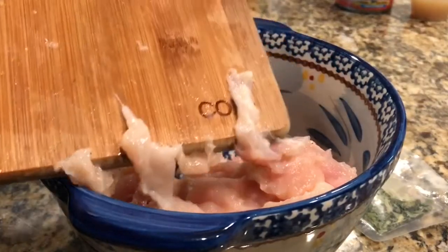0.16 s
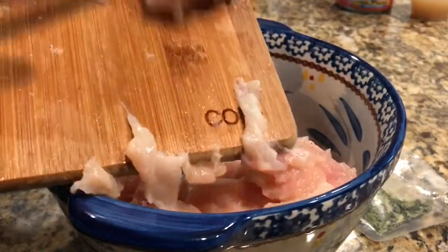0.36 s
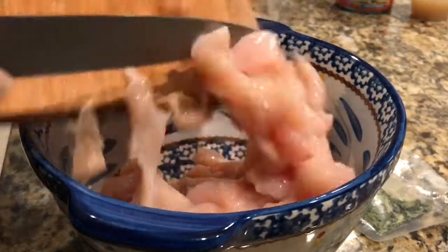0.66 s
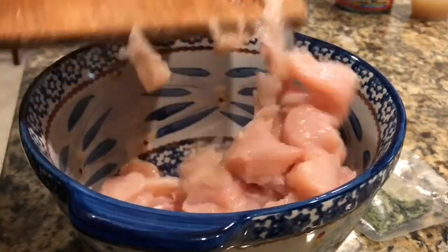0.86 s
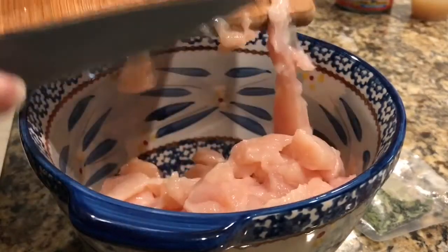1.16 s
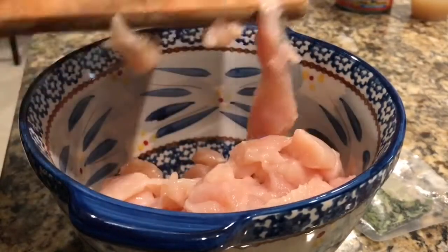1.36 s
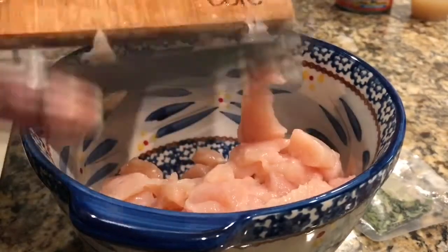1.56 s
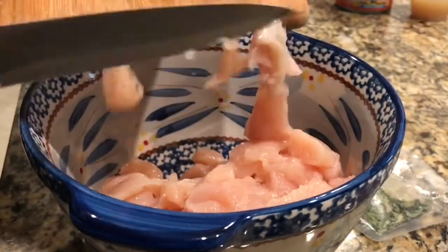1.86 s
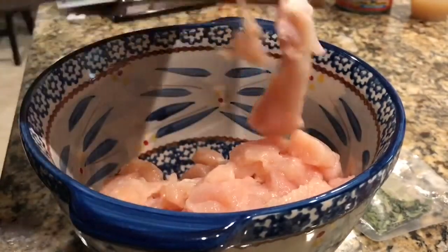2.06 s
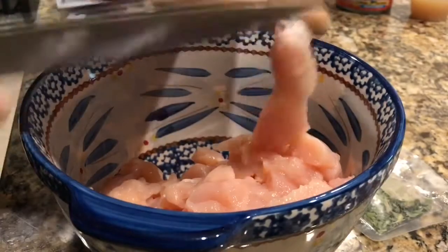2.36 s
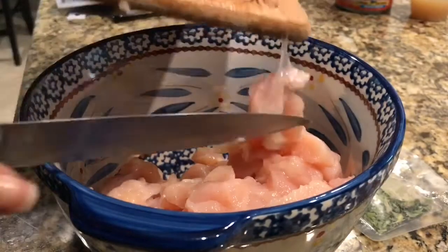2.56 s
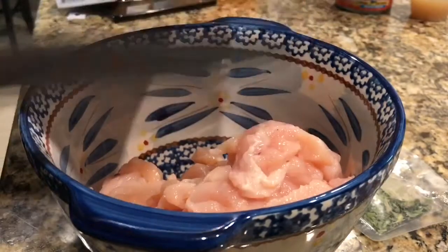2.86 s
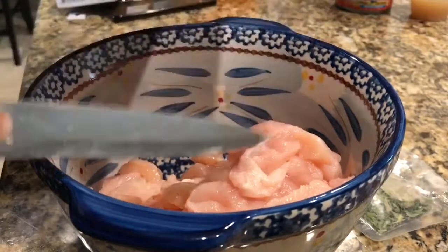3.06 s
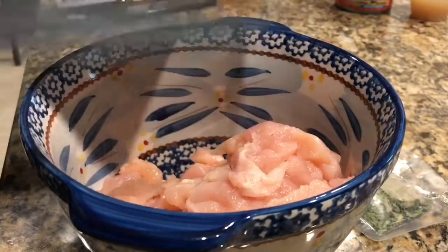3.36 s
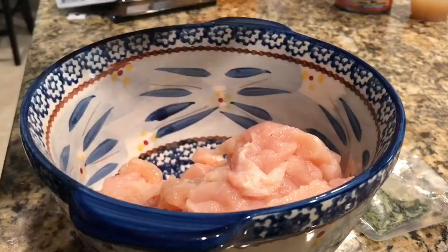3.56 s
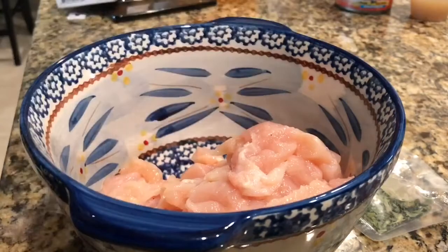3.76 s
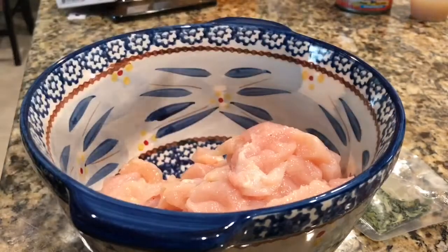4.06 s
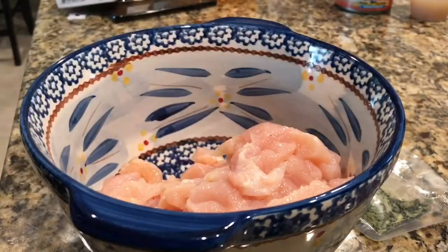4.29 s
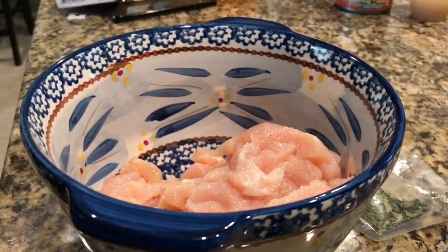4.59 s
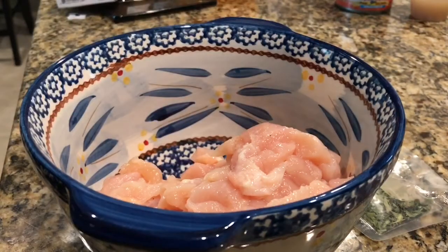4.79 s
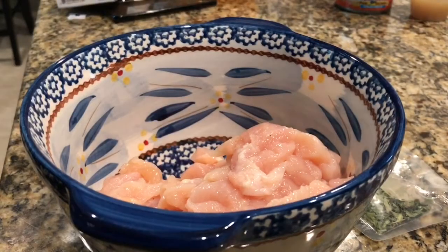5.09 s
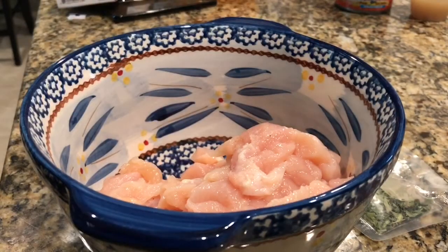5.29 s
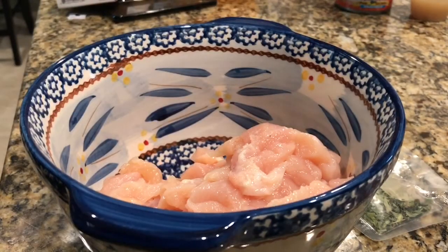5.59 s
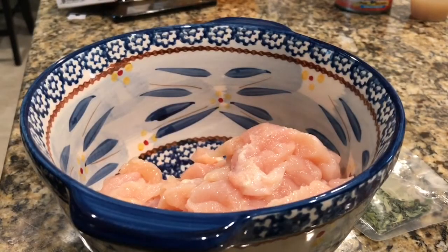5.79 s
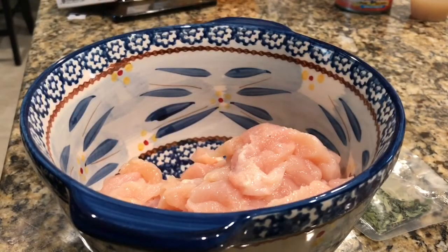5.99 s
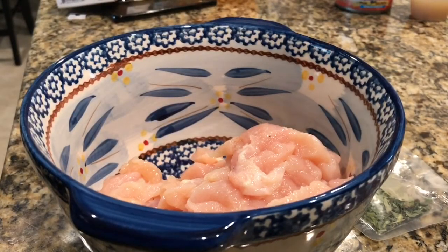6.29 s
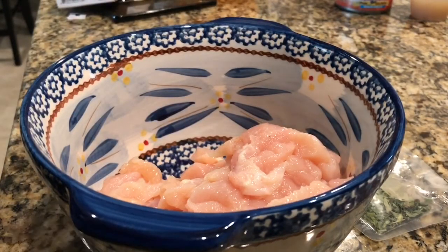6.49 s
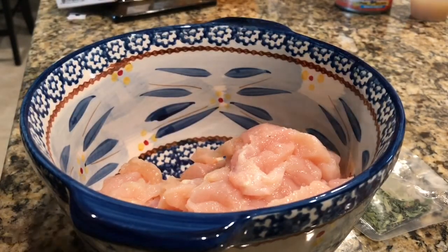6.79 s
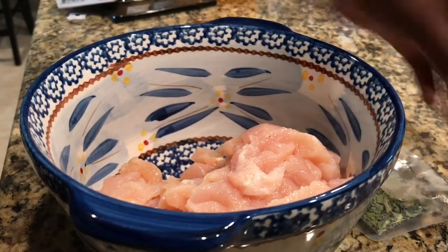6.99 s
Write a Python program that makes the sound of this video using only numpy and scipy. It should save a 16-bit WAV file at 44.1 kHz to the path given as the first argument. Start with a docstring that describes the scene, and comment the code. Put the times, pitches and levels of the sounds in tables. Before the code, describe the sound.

Close microphone, indoor kitchen, low steady hush. A soft tap opens, then tiny moist ticks, then several sharp woody knocks with brief rasping, slightly squealing blade strokes and wet hiss. Near quiet follows. Farther off, a metallic clack and a tumbling run of hollow wooden bangs and blade clinks ring in a sink, fading into faint rustle.

```python
"""Kitchen, close microphone: over room hush and the beating hum of two motors, a knife starts tapping a board.
Wet meat ticks, and the board bumps the bowl twice as the blade scrapes diced chicken into it, until 2.6 s.
After a faint rustle, knife and board clatter into a sink across the room from 4.1 to 6.2 s; it rings on.
Struck wood and metal are decaying modes, scrapes are coloured noise, motors are steady sines,
and sparse random echoes make the room."""
import sys
import numpy as np
from scipy import signal
from scipy.fft import rfft, irfft, next_fast_len
from scipy.io import wavfile
from scipy.ndimage import uniform_filter1d

SR = 44100
rng = np.random.default_rng(int(sys.argv[2]) if len(sys.argv) > 2 else 0)


def waveform_to_disk(signal):
    """Save audio, clipped to [-1, 1], as 16-bit WAV at the path in sys.argv[1]."""
    frames = np.transpose(np.atleast_2d(signal))
    scaled = np.clip(frames, -1, 1) * 32767
    samples = np.round(scaled).astype(np.int16)
    wavfile.write(sys.argv[1], SR, samples)


N = 315176

# All levels are relative. Spectra are scaled to rms 1 in use, so only their shape counts.
# Hum: multiples of each motor's turning rate (multiple, level/dB)
MOTOR_HZ, MOTOR_ORDERS = 59.3, [(1, -66), (2, -83), (4, -69), (5, -66), (19, -86), (20, -80)]
FAN_HZ, FAN_ORDERS = 61.49, [(1, -70), (2, -81), (3, -79)]
# a third faint tone (f/Hz, level/dB)
LOW_TONE = (68.72, -75)
IN_STEP_S = 0.358  # a moment when the two motors swing together
# spectrum of the room's hush (f/Hz, level/dB per Hz)
HUSH = [(15, -41.5), (25, -19), (59, -22.5), (108, -2), (285, -2.5), (344, -9), (416, -14), (641, -15),
        (936, -17.5), (1160, -17), (1650, -23.5), (3520, -27), (10400, -30.5), (12900, -34.5), (16000, -34)]
HUSH_DB = -62

# blade landing on the board; a flat landing wakes the low modes, a hard edge the high ones, the grip damps them
# (t/s, level/dB, ring-time factor, low modes/dB per octave down, high modes/dB per octave up,
#  extra on the mode near PIVOT_HZ/dB)
TAPS = [(0.051, -13, 1, -8, 2, 3.5), (0.058, -20, 0.93, -1.5, -1.5, 9), (0.07, -28.5, 0.63, -17, 6, -5),
        (0.984, 0, 0.91, -2.5, -1.5, 5), (1.541, -3.5, 0.6, -3.7, 1.5, -0.5),
        (1.858, -16.5, 1, -2, -3.5, -7.5), (1.878, -34, 1, 1.5, 0.5, -3), (2.113, -4, 1, 1.4, -1.5, 3),
        (2.515, -26.5, 1, 5, 2.5, -6), (2.54, -17.5, 1, -0.5, -1.5, -16.5)]
PIVOT_HZ = 1870  # low modes lie under this, high modes over it
# colour of a tap (f/Hz, level/dB)
LANDING = [(400, -27.5), (910, -16), (1290, -19), (1870, -12.5), (2400, -18.5), (3600, -13), (6000, -23.5),
           (9000, -26)]
# modes of the hand-held board (f/Hz, level/dB, t60/s before a tap's ring-time factor)
BOARD = [(302, 0.5, 0.027), (558, -5.5, 0.023), (904, -5.5, .035), (1062, 4, 0.013), (1293, 5, 0.019),
         (1889, -1.5, 0.029), (2254, -4.5, 0.029), (2470, 1, 0.016), (2700, -4.5, 0.022), (3240, -2, 0.012),
         (3643, -4, .02), (4090, -8.5, .025), (4766, -8, 0.0057), (5300, 0, 0.0064), (6510, 0, 0.01),
         (8800, -7, .012), (9200, 3, 0.0061)]

# decay of the kitchen's echoes (f/Hz, t60/s)
KITCHEN = [(100, 0.21), (260, 0.61), (700, 0.57), (1840, 0.58), (4850, 0.58), (9000, 0.53), (14000, 0.45)]

# sticky meat letting go, the clearest ticks (t/s, level/dB, f/Hz)
TICKS = [(0.0936, -50, 10500), (0.2318, -53, 7690), (0.3095, -53, 2200), (0.3205, -50, 13990),
         (0.3582, -46.5, 3465), (0.3666, -39.5, 4440), (0.3777, -43.5, 4033), (0.414, -45, 12180),
         (0.4614, -48, 15000), (0.4764, -54.5, 4340), (0.5239, -44, 10010), (0.671, -49, 14100),
         (0.676, -53.5, 2950), (0.7501, -43, 9890), (0.7645, -50.5, 14840), (0.7708, -45, 7490),
         (0.8137, -51.5, 11920), (0.8675, -51, 8580), (1.2384, -47, 4570), (2.0058, -47, 14830),
         (2.0293, -49.5, 6500), (2.0435, -52, 11430), (2.5742, -42, 15000), (3.1593, -56.5, 3700),
         (3.2065, -57, 13060), (6.4122, -52, 1210)]
# stretches of faint ticks at random (from t/s, to t/s, how many)
FAINT_TICKS = [(0.15, 0.95, 18), (2.6, 3.3, 6)]
FAINT_DB, FAINT_SPREAD_DB, FAINT_LOW_HZ, FAINT_TOP_HZ = -57, 5, 7000, 15500
TICK_CYCLES = 2.0  # a tick dies by 1/e in this many cycles

# faint rustle of movement, one list a spell (t/s, level/dB)
RUSTLE = [
    [(0.12, -77), (0.17, -72), (0.36, -61.5), (0.41, -68.5), (0.62, -74), (0.75, -71), (0.95, -80)],
    [(2.66, -81.5), (2.9, -100), (3.32, -80), (3.522, -67), (3.86, -80.5), (3.992, -71.5), (4.268, -89),
     (4.454, -71), (4.55, -71)],
    [(6.22, -64.5), (6.39, -62.5), (6.476, -67), (6.594, -62), (6.7, -68.5), (7.074, -74), (7.14, -70.5)],
]
# spectra of its dull and its bright part (f/Hz, level/dB per Hz)
RUSTLE_COLOUR = [(300, -18), (1000, -0.5), (3000, -4.5), (5000, -11), (7000, -32)], [(3000, -33),
                 (5500, 1.5), (9000, 3), (16000, -4.5)]
RUSTLE_BRIGHT_DB = -2.5  # the bright part against the dull part

# the board bumping the bowl (t/s, knock level/dB, boom level/dB)
THUDS = [(0.264, -24, -37), (1.54, -22, -69)]
KNOCK_HZ, SNAP_HZ, BOOM_HZ = 567.6, 1860, 95.77

# blade dragged over the wood, one list a stroke (t/s, grip on the grain level/dB, bite of the edge level/dB)
STROKES = [
    [(0.535, -62, -47.5), (0.541, -39, -46), (0.555, -43.5, -46), (0.61, -70, -67.5)],
    [(0.945, -87, -89.5), (0.963, -65, -76), (0.972, -56, -76.5)],
    [(0.995, -40, -55.5), (1.023, -45, -47.5), (1.053, -42, -44), (1.133, -50, -51.5), (1.185, -48.5, -46),
     (1.257, -43.5, -41.5), (1.275, -50, -77)],
    [(1.548, -28, -44.5), (1.558, -39.5, -45), (1.58, -45, -50.5), (1.61, -55, -62.5)],
    [(2.125, -41, -52), (2.183, -47, -67.5), (2.199, -37.5, -49.5), (2.22, -36.5, -44.5),
     (2.243, -35.5, -44.5), (2.265, -58, -63)],
    [(2.544, -51, -56), (2.553, -46, -54), (2.562, -59, -80), (2.59, -60, -77.5)],
]
# for each stroke (wet hiss over the bite level/dB, squeal at start f/Hz, squeal at end f/Hz)
SLIDES = [(-3, 3450, 3200), (-10, 3700, 3550), (-4.5, 3300, 3900), (-2, 3700, 4400), (-6, 3500, 3400),
          (4.5, 3660, 4400)]
# spectra of the drag on the grain, the bite of the edge, the wet hiss (f/Hz, level/dB per Hz)
GRIP = [(180, -26.5), (300, -5), (405, -16), (871, -5), (1430, 1.5), (1600, -2.5), (2800, -7), (3640, -51),
        (6160, -120)]
BITE = [(1530, -34.5), (2600, -7.5), (3270, 2), (3510, -10.5), (3930, -7), (5650, 0.5), (8000, -19),
        (10400, -41.5), (17600, -120)]
HISS = [(5000, -28), (7500, -1.5), (10500, -5.5), (13500, -12.5), (16000, -12.5)]

# what sounds at the sink
# (name, noise band from f/Hz, to f/Hz, share of ringing 0-1, modes as (f/Hz, width/Hz, level/dB))
PARTS = [("board bending", 785, 1390, 1, [(847.5, 21, -8.5), (942.3, 66, 2), (1106.5, 62, -10)]),
         ("board flapping", 370, 1030, 0.58, [(546, 35, -7.5), (639.5, 33, 0.5)]),
         ("board knocking", 1250, 2440, 0.31, [(1300, 31, -7.5), (1917, 17, -1.5), (2178, 45, 2.5),
         (2413, 40, -6)]), ("blade clashing", 2465, 5410, 0.13, [(3050, 53, -7), (4055, 200, 1.5)]),
         ("blade edge", 5800, 10000, .1, [(6200, 200, 0), (6900, 200, -2)]),
         ("grit", 10000, 15500, 0, [(12000, 900, 0)]), ("basin wall", 236, 370, 0.75, [(258.5, 49, -5),
         (299.3, 37, 1.5)]), ("basin floor", 151, 230, 1, [(178, 16, -2), (204.4, 18, -1.5)]),
         ("cabinet", 45, 120, 0.87, [(64.1, 6, -1), (96.6, 15, 0)])]
# blows at the sink (t of full force/s, board level/dB, blade level/dB, edge against blade level/dB,
#  grit against blade level/dB, basin wall level/dB, basin floor level/dB, rocking against blow level/dB)
BLOWS = [(4.136, -70, -56.5, 0, -18, -64.5, -72, -20), (4.578, -25.5, -14, -7, -30, -21.5, -25.5, -39),
         (4.596, -63, -19, -12, -49, -57, -42, -45), (5.079, -33, -31.5, -18, -32, -19, -39, -8),
         (5.111, -33.5, -40.5, -11, -32, -27, -35, -6.5),
         (5.243, -35, -57, -11.5, -26.5, -40.5, -50.5, -15),
         (5.314, -39, -37.5, -20, -30, -53, -52.5, -12.5),
         (5.428, -18.5, -31.5, -3.5, -20, -30.5, -44.5, -6),
         (5.531, -29.5, -48.5, 0, -12.5, -25.5, -37.5, -8.5),
         (5.616, -23, -42, -12.5, -23, -45, -52.5, -7.5), (5.662, -23.5, -26, -8, -22, -39, -54.5, -9),
         (5.670, -7, -26, -5, -22, -26.5, -22.5, -24.5), (5.692, -27, -25.5, -7.5, -16, -24.5, -23.5, -15),
         (5.736, -15, -21.5, -10.5, -20.5, -34.5, -27, -11), (5.775, -20.5, -17, -11, -22, -43, -35, -17),
         (5.810, -19, -27.5, -17.5, -28, -29.5, -18.5, -7.5),
         (6.152, -37.5, -63.5, -5, -2.5, -48.5, -36.5, -10.5),
         (6.211, -53.5, -71.5, -7.5, -6, -46, -39, -17)]
CONTACT_S, ROCK_S = 0.0023, 0.074  # a blow's contact and the rocking after it die by 1/e in these times
FLAP_DB, FLAP_SHARE = -10, 0.38  # flapping lies between board and basin wall
KNOCK_DB, KNOCK_SHARE = 0, 0.46  # knocking lies between board and blade
CABINET_DB, CABINET_SHARE = -8.5, 0.29  # the cabinet follows floor and wall of the basin

# the microphone: dips of its housing (f/Hz, level/dB)
MIC = [(6500, 0), (7500, -0.5), (8600, -3), (9700, -4.5), (10500, -6), (11500, 0.5), (12500, 1.5)]
EDGE_HZ = 15900  # top of its band


def gain_of(db):
    """Decibels to an amplitude factor."""
    return 10 ** (np.asarray(db) / 20)


def evened(x):
    """Scales to rms 1."""
    return x / np.sqrt(np.mean(x ** 2) + 1e-20)


def read(points, hz):
    """Reads a table along a log-frequency axis."""
    f, value = np.transpose(points)
    return np.interp(np.log(hz + 1), np.log(f + 1), value)


def add(mix, s, sound):
    """Adds a sound from time s on."""
    part = mix[round(s * SR):][:len(sound)]
    part += sound[:len(part)]


def level(tables, column):
    """Smoothed gain curve of one column of some tables, silent outside them."""
    out, t = np.zeros(N), np.arange(N) / SR
    for rows in tables:
        s, db = np.transpose(rows)[[0, column]]
        out += gain_of(np.interp(t, s, db, -200, -200))
    return uniform_filter1d(out, 90)


def coloured(x, points):
    """Gives x a spectrum; white noise keeps its rms."""
    size = next_fast_len(len(x))
    gain = gain_of(read(points, np.fft.rfftfreq(size, 1 / SR)))
    return irfft(rfft(x, size) * evened(gain), size)[:len(x)]


def ring(modes):
    """Response of (Hz, width Hz, dB) resonances to one click, energy 1; a wider resonance dies faster."""
    t = np.arange(SR // 4) / SR
    out = np.zeros(len(t))
    for hz, width, db in modes:
        decay = np.exp(-np.pi * width * t)
        out += gain_of(db) * np.sqrt(width) * decay * np.sin(2 * np.pi * hz * t)
    return out / np.linalg.norm(out)


def gritty(spread_db):
    """Noise whose loudness jumps from one millisecond to the next."""
    lumps = evened(uniform_filter1d(rng.standard_normal(N), 60))
    return evened(rng.standard_normal(N) * gain_of(spread_db * lumps))


def hum():
    """Motors sound at multiples of their turning rates; close rates beat."""
    t = np.arange(N) / SR - IN_STEP_S
    tones = [(k * MOTOR_HZ, db) for k, db in MOTOR_ORDERS]
    tones += [(k * FAN_HZ, db) for k, db in FAN_ORDERS]
    tones.append(LOW_TONE)
    return sum(np.sqrt(2) * gain_of(db) * np.cos(2 * np.pi * hz * t) for hz, db in tones)


def hush():
    """The room at rest: steady noise, mostly low."""
    return gain_of(HUSH_DB) * coloured(rng.standard_normal(N), HUSH)


def taps():
    """Each tap rings the board's modes, swelling over the contact, along with a crack of noise."""
    out, t = np.zeros(N), np.arange(3500) / SR
    hz, mode_db, t60 = np.transpose(BOARD)[:, :, None]
    octaves = np.log2(hz / PIVOT_HZ)
    for s, db, ring_time, low_db, high_db, pivot_db in TAPS:
        phase = rng.random(hz.shape)
        crack = uniform_filter1d(rng.standard_normal(len(t)), size=4) * np.exp(-t / 0.0035)
        tilt_db = np.where(octaves < 0, -low_db, high_db) * octaves
        spot_db = read(LANDING, hz) + tilt_db + pivot_db * (abs(octaves) < 1 / 20)
        height = gain_of(db + spot_db + mode_db - 60 * t / (t60 * ring_time))
        rings = (height * np.sin(2 * np.pi * (hz * t + phase))).sum(0)
        rings *= 1 - np.exp(-t / 0.00029)
        # the crack is as strong as the tap's drive on the highest mode, plus 8 dB
        add(out, s, gain_of(3) * rings + gain_of(db + spot_db[-1] + 8) * crack)
    # a small board radiates no bass
    return signal.sosfilt(signal.butter(2, 220, "high", fs=SR, output="sos"), out)


def room(x, delay_s, build_s, early):
    """Sparse echoes of random sign, each band dying at its own speed.

    Three random echo sets fade in and out in turn, so no single echo pattern colours every sound.
    """
    out, turn = np.zeros(N), 2 * np.pi * 5.5 * np.arange(N) / SR
    age = np.arange(SR) / SR
    for k in range(3):
        echoes, at = np.zeros(SR), np.arange(0, SR - 8, 8)
        echoes[at + rng.integers(0, 8, len(at))] = rng.choice([-1., 1.], len(at))
        # nearby surfaces answer first and loudest
        echoes *= (1 - np.exp(-age / build_s)) * (1 + early * np.exp(-age / 0.015))
        hz, t, bands = signal.stft(echoes, SR, nperseg=512)
        bands = bands * gain_of(-60 * t / read(KITCHEN, hz)[:, None])
        tail = signal.istft(bands, SR, nperseg=512)[1]
        tail = np.r_[np.zeros(round(delay_s * SR)), tail / np.linalg.norm(tail)]
        share = np.sqrt(2 / 3) * np.cos(turn + k * 2 * np.pi / 3)
        out += signal.fftconvolve(x * share, tail)[:N]
    return out


def ticks():
    """Each tick is a few fast-dying cycles; the faint ones fall at random."""
    out, t, rows = np.zeros(N), np.arange(400) / SR, list(TICKS)
    for start, end, many in FAINT_TICKS:
        for when, size, pitch in rng.random((many, 3)):
            s = start + (end - start) * when
            db = FAINT_DB + FAINT_SPREAD_DB * (2 * size - 1)
            rows.append((s, db, FAINT_LOW_HZ + (FAINT_TOP_HZ - FAINT_LOW_HZ) * pitch))
    for s, db, hz in rows:
        add(out, s, gain_of(db + 10.0) * np.sin(2 * np.pi * hz * t) * np.exp(-t * hz / TICK_CYCLES))
    return out


def rustle():
    """Movement rubs: a dull and a bright uneven noise swell together."""
    dull, bright = (coloured(gritty(1.4), part) for part in RUSTLE_COLOUR)
    return level(RUSTLE, column=1) * (dull + gain_of(RUSTLE_BRIGHT_DB) * bright)


def thuds():
    """A dull knock with a small snap, with the low boom of the counter, slower to swell and die."""
    out, t = np.zeros(N), np.arange(5000) / SR
    for s, knock_db, boom_db in THUDS:
        knock = np.sin(2 * np.pi * KNOCK_HZ * t) * t / 0.0019 * np.exp(1 - t / 0.0011)
        snap = 0.2 * np.sin(2 * np.pi * SNAP_HZ * t) * np.exp(-t / 0.002)
        boom = np.sin(2 * np.pi * BOOM_HZ * t) * t / 0.012 * np.exp(1 - t / 0.0099)
        add(out, s, gain_of(knock_db) * (knock + snap) + gain_of(boom_db) * boom)
    return out


def strokes():
    """The edge catches on the grain and drives the damped board, squeals broadly, and juice hisses under it."""
    # width 2.2 / t60, and a fifth more for damping; all modes equally strong
    board = ring([(hz, 2.2 / t60 * 1.2, 0) for hz, _, t60 in BOARD])
    grit = gritty(3.5)
    drag = 0.9 * signal.oaconvolve(grit, board)[:N] + 0.45 * grit
    # the squeal is a resonance that moves: noise shifted down, low-passed, shifted back up
    ends_s = [rows[k][0] for rows in STROKES for k in (0, -1)]
    hz = np.interp(np.arange(N) / SR, ends_s, np.array(SLIDES)[:, 1:].ravel())
    turn = np.exp(2j * np.pi * np.cumsum(hz) / SR)
    squeal = (turn * signal.lfilter(*signal.butter(2, 450, fs=SR), grit / turn)).real
    bite = 1.1 * evened(coloured(drag, BITE)) + evened(squeal)
    grip = evened(coloured(drag, GRIP))
    wet_level = sum(gain_of(slide[0]) * level([rows], column=2) for rows, slide in zip(STROKES, SLIDES))
    wet = wet_level * coloured(gritty(1.6), HISS)
    return level(STROKES, column=1) * grip + level(STROKES, column=2) * bite + wet


def shared_out(board_db, blade_db, edge_db, grit_db, wall_db, floor_db):
    """How hard one blow drives each of PARTS, in dB."""
    flap_db = FLAP_DB + board_db + FLAP_SHARE * (wall_db - board_db)
    knock_db = KNOCK_DB + board_db + KNOCK_SHARE * (blade_db - board_db)
    cabinet_db = floor_db + CABINET_DB + CABINET_SHARE * (wall_db - floor_db)
    return np.array([board_db, flap_db, knock_db, blade_db, blade_db + edge_db, blade_db + grit_db,
                     wall_db, floor_db, cabinet_db])


def sink():
    """Blows (one sharp click, a rough contact, then a looser rocking) drive every part; each rings and rasps."""
    build_s = 0.004  # the echoes take this long to pile up, so a blow starts this much early
    t = np.arange(SR // 2) / SR
    pushes, clicks = np.zeros((len(PARTS), N)), np.zeros((len(PARTS), N))
    for s, *force, rock_db in BLOWS:
        drive_db = shared_out(*force)
        clicks[:, round((s - build_s) * SR)] += gain_of(drive_db + 21.5)
        push = np.exp(-t / CONTACT_S) + gain_of(rock_db) * np.exp(-t / ROCK_S)
        for row, part_db in zip(pushes, drive_db):
            add(row, s - build_s, gain_of(part_db - 6) * push)
    out = np.zeros(N)
    shakes = pushes * gritty(3.5) + clicks
    for shake, (_, low_hz, high_hz, ringing, modes) in zip(shakes, PARTS):
        rung = np.sqrt(ringing) * signal.oaconvolve(shake, ring(modes))[:N]
        # a narrow band passes less noise, so its rasp is raised to match
        rasp = np.sqrt((1 - ringing) * SR / 2 / (high_hz - low_hz)) * shake
        band = signal.butter(4, [low_hz, high_hz], "band", fs=SR, output="sos")
        out += signal.sosfilt(band, rung + rasp)
    return out


def scene():
    """Near sounds are mostly direct, the sink across the kitchen nearly all echo."""
    near = taps() + ticks() + thuds() + strokes()
    far = sink()
    near_echo = gain_of(-14.5) * room(near, delay_s=0.0047, build_s=0.0011, early=1.0)
    far_echo = gain_of(1) * room(far, delay_s=0, build_s=0.0031, early=2.25)
    background = hum() + hush() + rustle()
    return (near + near_echo + gain_of(-12.5) * far + far_echo + background)[None]


def record(dry):
    """The microphone's colour, then the band limit."""
    heard = coloured(dry[0], MIC)[None]
    lowpass = signal.firwin(511, EDGE_HZ, window=("kaiser", 9), fs=SR)
    return signal.oaconvolve(heard, lowpass[None], "same")


dry = scene()
out = record(dry)
waveform_to_disk(out)
```